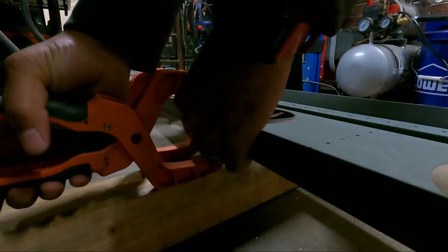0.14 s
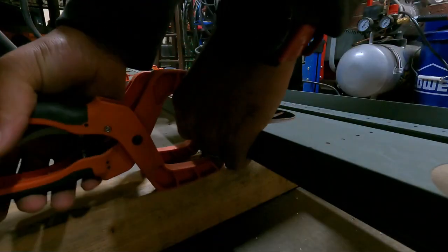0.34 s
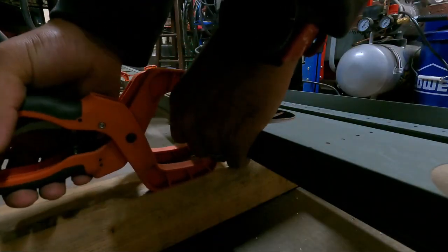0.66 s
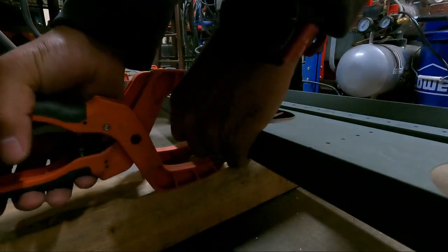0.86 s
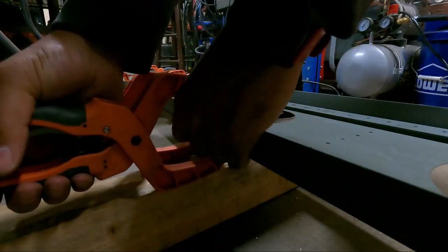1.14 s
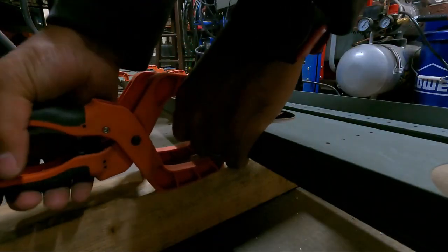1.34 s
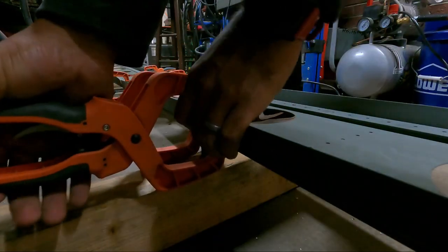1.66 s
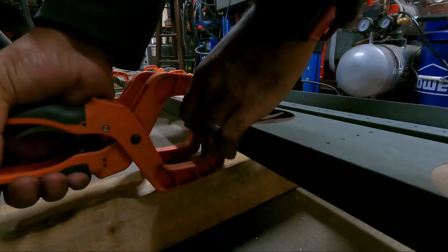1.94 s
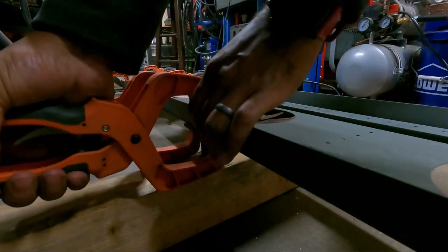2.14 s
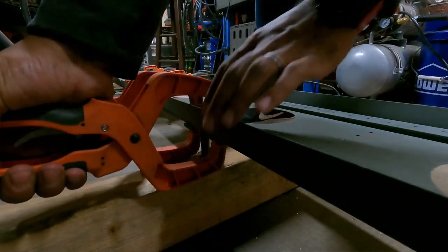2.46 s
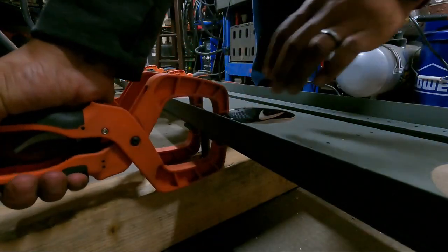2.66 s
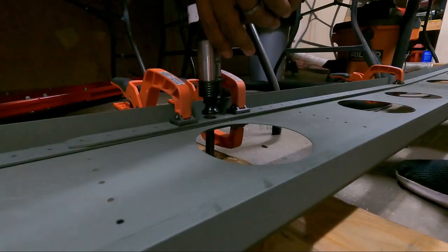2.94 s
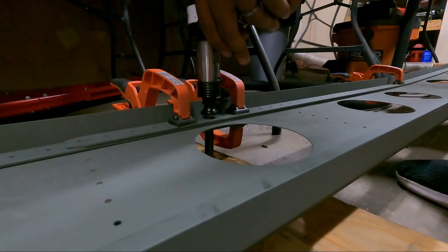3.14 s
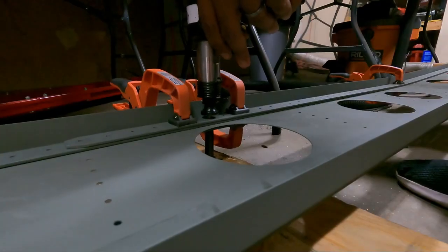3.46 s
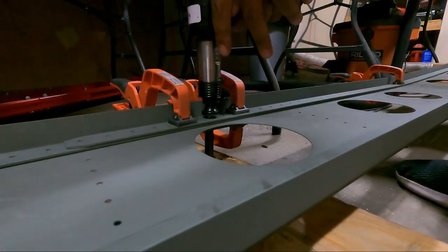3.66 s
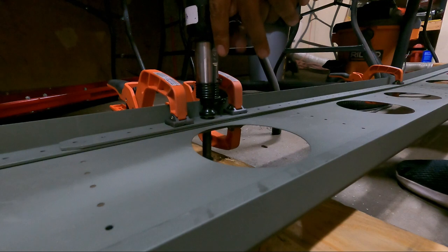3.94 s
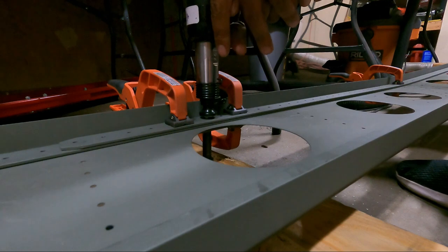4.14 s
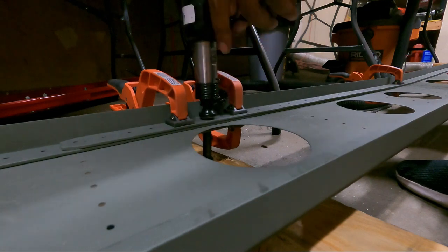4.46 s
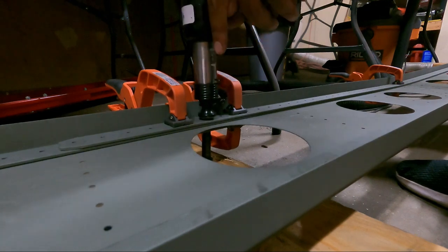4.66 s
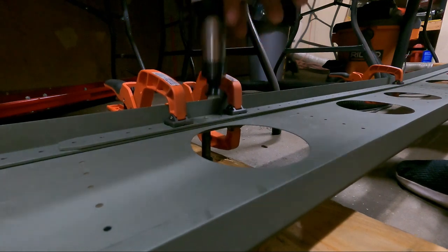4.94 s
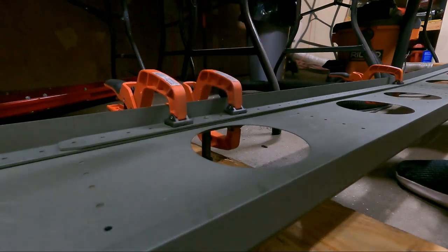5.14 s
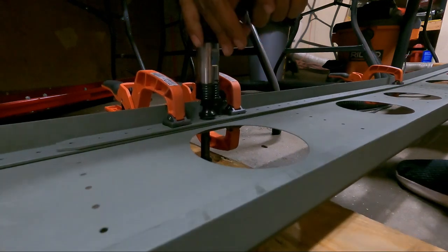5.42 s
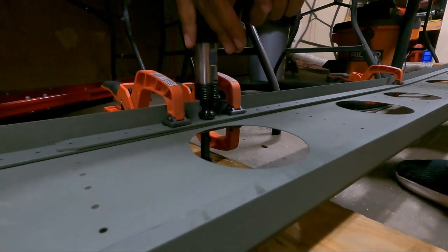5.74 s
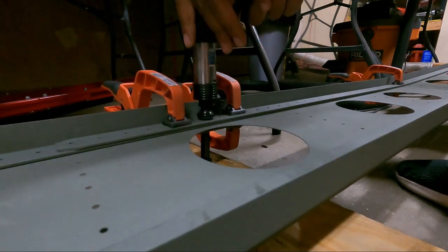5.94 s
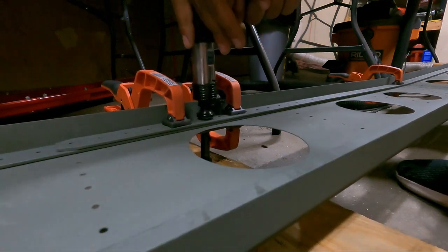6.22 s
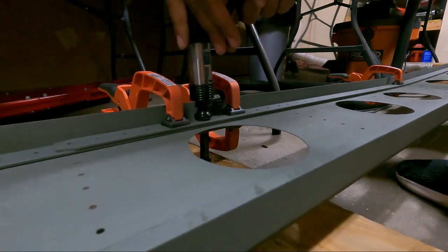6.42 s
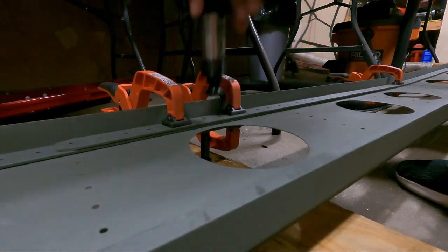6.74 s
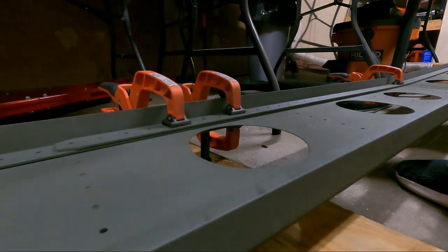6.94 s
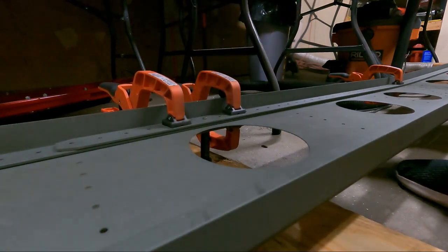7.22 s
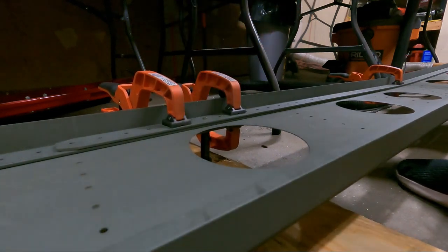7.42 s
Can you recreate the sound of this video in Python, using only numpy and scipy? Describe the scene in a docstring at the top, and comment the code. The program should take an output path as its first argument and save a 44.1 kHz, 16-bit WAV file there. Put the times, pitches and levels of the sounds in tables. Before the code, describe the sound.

In a garage workshop, a motor hums low while a hand clamp is squeezed close by, giving a quick run of sharp ratchet clicks and then a few separate ones. The hum drops away and an air rivet gun fires five short bursts into an aluminium panel, each a pop and hiss with rapid metallic hammering and thuds through a wooden bench. A faint hose whistle and a brief room echo trail each burst.

```python
"""A motor hums in a garage while hands squeeze a ratchet clamp onto an aluminium panel, click by click.
Then an air-powered rivet gun fires five short bursts: its valve pops, air hisses, and its piston hammers
about 36 times a second, slowing as the trigger is let go. Panel, bench and room ring, the air hose
whistles on briefly, and a limiter turns the loudest moments down."""
import sys
import numpy as np
from scipy import signal
from scipy.fft import rfft, irfft
from scipy.io import wavfile
from scipy.ndimage import uniform_filter1d

SR = 44100
rng = np.random.default_rng(int(sys.argv[2]) if len(sys.argv) > 2 else 0)


def pcm_store(signal):
    """Save signal as 16-bit PCM."""
    levels = np.round(np.clip(np.atleast_2d(signal), -1, 1) * 32767)
    wavfile.write(sys.argv[1], SR, levels.astype(np.int16).T)


N = 334278
TIME = np.arange(N) / SR
HIT_TIME = TIME[:SR // 4]  # the clock for one short sound
# time between hammer blows, and from the valve's pop to the first blow
BLOW_GAP_S, POP_TO_BLOW_S = .02785, .0288

# stretches of workshop rumble, each entering abruptly: start_s, level_db
RUMBLE_STRETCHES = [(0, -44.5), (.25, -41.5), (3.68, -41.5), (4.56, -45), (5.325, -40)]
# how loud the motor hums: time_s, level_db
HUM_LEVELS = [(0, -50), (.45, -39), (1, -35.5), (2, -37), (2.85, -41.5), (3, -82)]
# hands sliding on clamp and gun: middle_s, half_length_s, level_db
HAND_RUBS = [(0.045, 0.23, -71), (0.746, 0.056, -65.5), (0.914, 0.022, -66), (0.989, 0.027, -66.5),
             (1.7, 0.092, -58), (2.24, 0.065, -50.5), (2.7, .08, -55), (7.288, 0.11, -68)]
# faint touches of metal on metal: start_s, level_db, pitch_hz, ring_db
METAL_TOUCHES = [(.028, -57, 2400, 11.5), (.076, -55.5, 4100, 1), (4.362, -41.5, 3590, -4),
                 (6.24, -61.5, 3080, -11), (7.192, -57, 3330, -10), (7.266, -59, 5460, -12),
                 (7.333, -53, 5160, -9)]
# the ratchet's catch snapping over its teeth: start_s, level_db, knock_db, treble_db, pitch_hz
RATCHET_CLICKS = [(.218, -10.5, -4.5, 7, 1750), (0.2269, -3.5, -20.5, -1.5, 1750),
                  (0.2309, -11, -14, 2.5, 3500), (.239, -11, -23.5, 10, 3500), (0.2621, -6, -21, -1, 1750),
                  (.2707, -10, -12, 8.5, 3500), (.274, -3, -13.5, 3, 5800), (0.296, -12, -5, -0.5, 1750),
                  (1.2024, -4.5, -12.5, 0.5, 1720), (1.212, -6.5, -7, 3.5, 1720),
                  (1.3395, -3, -16, 0, 4150), (2.232, -7.5, -4.5, 1.5, 3400), (2.413, -4, -15.5, 3, 5100),
                  (2.6454, -10, -5, 2, 2900)]
# trigger pulls: start_s, stop_s, blow_db, sag_db_per_s, pop_db, hiss_db, push_db, treble_db
TRIGGER_PULLS = [(3.018, 3.156, -3.5, 24.5, 6.5, 1.5, 5, -3.5),
                 (3.853, 4.054, -2, 26.5, 1.5, 2.5, 5.5, 1.5), (4.7077, 4.848, -4.5, 22, 4, 5, 3.5, 0),
                 (5.439, 5.579, -4.5, 51, 1.5, -1, 4, 3), (6.373, 6.514, -6, -4, -11.5, 3, -1.5, -10)]

# the notes a struck thing rings with: pitch_hz, level_db, fade_s (time to fall by 60 dB)
CLAMP_NOTES = [(1700, 2, 0.023), (1940, -16.5, .04), (2550, -7, 0.13), (3152, 9.5, 0.021),
               (4280, -16, 0.023)]
METAL_NOTES = [(517, -19, 0.15), (859, -20.5, 0.13), (1074, -2, 0.064), (1162, 0.5, .059),
               (1580, -7.5, 0.057), (1927, -7.5, 0.04), (2550, 1.5, 0.047), (3030, -2.5, 0.03),
               (3215, -5.5, 0.034), (3485, -4.5, 0.078), (3550, -12, 0.057), (4980, -9.5, 0.04),
               (5950, -16, 0.027)]  # the gun's tip and the panel
BENCH_NOTES = [(35, -2, .15), (63.3, -2, 0.029), (110, 11, .061), (149.1, -2.5, 0.1), (202, -1.5, 0.076),
               (278.5, -7.5, 0.13), (315.7, -6, 0.053)]  # the wooden bench

# tone colours, or how strong a sound is from low to high: pitch_hz, level_db
RUMBLE_TONE = [(20, -4), (65, -5), (120, 3.5), (220, -1), (300, -13.5), (480, -18), (850, -14), (1300, -18),
               (2000, -28.5), (3200, -43.5), (6000, -52), (10000, -59), (16000, -75.5)]
SNAP_TONE = [(100, -15), (450, -17), (1000, -3.5), (1700, 10), (3000, 5), (5200, 2), (7300, -3),
             (10500, -14.5), (13000, -16.5), (16000, -24)]
CRACK_TONE = [(100, 4), (400, -4.5), (850, 1), (1150, 8), (1400, 2), (2100, -4.5), (2500, 4.5), (3450, 1),
              (3800, -3.5), (5500, -5), (7500, -8), (10000, -22), (13000, -26), (16000, -50.5)]
HISS_TONE = [(100, 7), (500, -5), (1200, 5), (2100, -2.5), (3400, 1), (4200, -3.5), (5600, -2.5),
             (7500, -9), (10000, -17.5), (13000, -36.5), (16000, -26.5)]
THUD_TONE = [(15, -11.5), (35, 4.5), (70, 7), (180, 2.5), (320, -6.5), (470, -28), (900, -32.5),
             (3000, -77.5)]
GARAGE_ECHO_TONE = [(30, -28), (80, -20), (160, -9), (450, 11), (1000, 0.5), (3000, 0), (6000, 4.5),
                    (10000, 4), (15000, -8)]
BENCH_ECHO_TONE = [(60, -14), (300, -1.5), (3000, -4.5), (8000, 1), (15000, -11.5)]
SKIN_TONE = [(500, -10.5), (1800, 3.5), (3500, 11), (6000, 6), (8500, -6), (11000, -14), (16000, -31)]
WOOD_TONE = [(40, -9.5), (120, -5.5), (220, -7.5), (450, -14), (800, -12), (1300, -17), (5000, -49)]
STEREO_TONE = [(30, -15), (80, -23.5), (250, -16.5), (3000, -12), (6000, -6.5), (9000, -4.5), (13000, -1)]

# how long the echoes last: pitch_hz, fade_s
GARAGE_ECHO_FADES = [(100, 0.74), (400, 0.51), (1200, 0.644), (3000, 0.51), (6000, 0.4734), (10000, 0.32),
                     (15000, 0.3)]
BENCH_ECHO_FADES = [(200, .11), (1500, .26), (6000, .15), (14000, .1)]
# moments when the sound spreads to left and right: start_s, starts_closing_s, level_db
WIDE_MOMENTS = [(0, .3, -15.5), (2.884, 3.25, 0), (3.682, 4.05, -4), (5.317, 5.62, 2)]


def amp(db):
    """Turns decibels into a number to multiply by."""
    return 10 ** (np.asarray(db) / 20)


def evened(x):
    """Scales a signal to an average power of 1."""
    return x / np.sqrt(np.mean(x ** 2) + 1e-20)


def look_up(table, hz):
    """Reads between a table's rows along a musical (logarithmic) pitch scale."""
    pitches, values = np.transpose(table)
    return np.interp(np.log(hz + 1), np.log(pitches + 1), values)


def add(mix, start_s, sound):
    """Mixes a sound in at the given time."""
    part = mix[max(round(start_s * SR), 0):][:len(sound)]
    part += sound[:len(part)]


def fade(t, fade_s):
    """Stays at 1 until t is zero, then falls by 60 dB every fade_s."""
    return np.exp(-np.log(1000) * np.maximum(t, 0) / fade_s)


def noise(tone, size=N):
    """Steady noise with the given tone colour."""
    gains = amp(look_up(tone, np.fft.rfftfreq(size, 1 / SR)))
    return evened(irfft(rfft(rng.standard_normal(size)) * gains, size))


def drift(rate_hz):
    """A smooth random wander."""
    gains = np.exp(-(np.fft.rfftfreq(N, 1 / SR) / rate_hz) ** 2)
    return evened(irfft(rfft(rng.standard_normal(N)) * gains, N))


def burst(tone, fade_s, hold_s=0, rise_s=.0005):
    """A puff of noise that swells quickly, holds, and dies away."""
    shape = (1 - np.exp(-(HIT_TIME / rise_s) ** 2)) * fade(HIT_TIME - hold_s, fade_s)
    return evened(noise(tone, len(HIT_TIME)) * shape) * np.sqrt(np.mean(shape ** 2))


def note(hz, db, fade_s):
    """One pure note dying away."""
    return amp(db) * fade(HIT_TIME, fade_s) * np.sin(2 * np.pi * hz * HIT_TIME)


def ring(notes, spread_db, detune=.016):
    """Struck metal: each strike shares out its force and shifts the notes a little differently."""
    out = 0
    for k, (hz, db, fade_s) in enumerate(notes):
        db += spread_db * rng.standard_normal()
        hz *= 1 + detune * rng.standard_normal()
        out += (-1) ** k * note(hz, db, fade_s)
    return out * (1 - np.exp(-HIT_TIME / .00017))


def brighten(x, db, corner_hz=5500):
    """Turns the treble up or down."""
    treble = x - signal.lfilter(*signal.butter(1, corner_hz, fs=SR), x)
    return x + (amp(db) - 1) * treble


def workshop_rumble(sink_db_per_s=34, sunk_db=-53, creep_db_per_s=2.5):
    """A dull rumble: each stretch is steady until the gun next stops, then sinks and creeps back."""
    db = np.zeros(N)
    for start, steady_db in RUMBLE_STRETCHES:
        gun_stops = min(stop for _, stop, *_ in TRIGGER_PULLS if stop > start)
        since = np.maximum(TIME - gun_stops, 0)
        stretch_db = np.maximum(steady_db - sink_db_per_s * since, sunk_db + creep_db_per_s * since)
        db = np.where(TIME >= start, stretch_db, db)
    ceiling_db = max(steady_db for _, steady_db in RUMBLE_STRETCHES)
    return amp(np.minimum(db, ceiling_db)) * noise(RUMBLE_TONE)


def motor_hum(pitch_hz=89.3, octave_db=-9, waver_hz=6.4):
    """A motor hums a low note and its octave, wavering in pitch and loudness."""
    phase = 2 * np.pi * np.cumsum(pitch_hz * (1 + .015 * drift(waver_hz))) / SR
    hum = np.sin(phase) + amp(octave_db) * np.sin(2 * phase)
    db = np.interp(TIME, *np.transpose(HUM_LEVELS))
    return amp(db + 2 * drift(waver_hz)) * hum


def handling():
    """Skin rubs on plastic and steel; now and then metal touches metal."""
    sliding = sum(amp(db) * np.exp(-((TIME - s) / half_s) ** 2) for s, half_s, db in HAND_RUBS)
    out = sliding * noise(SKIN_TONE) * amp(2 * drift(rate_hz=60))
    for start, db, hz, ring_db in METAL_TOUCHES:
        tap = burst(SKIN_TONE, fade_s=.049, rise_s=.00066)
        add(out, start, amp(db) * (tap + note(hz, ring_db, fade_s=.088)))
    return out


def ratchet(snap_db=-3, catch_db=-6, body_db=-24):
    """The catch snaps over a tooth and rings briefly, shakes the clamp and knocks the bench under it."""
    out = np.zeros(N)
    for start, db, knock_db, treble_db, hz in RATCHET_CLICKS:
        snap = brighten(amp(snap_db) * burst(SNAP_TONE, fade_s=.015, rise_s=.00032), treble_db)
        knock = amp(knock_db - 9) * burst(WOOD_TONE, fade_s=.13, rise_s=.0023)
        catch = ring([(hz, catch_db, .008)], spread_db=1)
        body = amp(body_db) * ring(CLAMP_NOTES, spread_db=3.5)
        add(out, start, amp(db) * (snap + knock + catch + body))
    return out


def valve(pop_s=.00023, thump_db=8, thump_hz=190, thump_s=.0012, lag_s=.0017, rattle_db=-5):
    """The valve pops open; the gun lurches and its tip rattles on the rivet before the first blow."""
    out = np.zeros(N)
    pop_age, thump_age = HIT_TIME / pop_s, HIT_TIME / thump_s
    pop = pop_age * (2 - pop_age) * np.exp(1 - pop_age)
    thump = thump_age * np.exp(1 - thump_age) * np.sin(2 * np.pi * thump_hz * HIT_TIME)
    for start, *_, pop_db, _, _, treble_db in TRIGGER_PULLS:
        tick = amp(-9) * burst(CRACK_TONE, fade_s=.034, rise_s=.0021)
        add(out, start, amp(pop_db) * brighten(amp(2) * pop + tick, treble_db))
        add(out, start + lag_s, amp(pop_db + thump_db) * thump)
        for delay in rng.uniform(.014, .027, size=3):
            rattle = pop + .5 * burst(CRACK_TONE, fade_s=.022)
            add(out, start + delay, amp(pop_db + rattle_db) * rattle)
    return out


def air_hiss(level_db=-16, surge_db=7, surge_s=.022, surge_width_s=.026, open_s=.014):
    """Air surges out as the piston first draws back, hisses on, and dies when the valve shuts."""
    out = np.zeros(N)
    air = noise(HISS_TONE) + amp(3) * noise(THUD_TONE)
    for start, stop, *_, hiss_db, _, treble_db in TRIGGER_PULLS:
        surge = surge_db * np.exp(-((TIME - start - surge_s) / surge_width_s) ** 2)
        flow = np.clip((TIME - start) / open_s, 0, 1) * fade(TIME - stop, fade_s=.32)
        out += amp(hiss_db + surge) * flow * brighten(air, treble_db)
    return amp(level_db + 2 * drift(rate_hz=100)) * out


def hose_whistle(pitch_hz=1225, width_hz=60, fuzz_hz=190, level_db=-28, sag_db_per_s=42, refill_s=.22):
    """The air hose whistles, fuzzily, until it has refilled after each burst."""
    off_hz = np.fft.rfftfreq(N, 1 / SR) - pitch_hz
    band = np.exp(-.5 * (off_hz / width_hz) ** 2) + amp(-12) * np.exp(-.5 * (off_hz / fuzz_hz) ** 2)
    flow = np.zeros(N)
    for start, stop, *_ in TRIGGER_PULLS:
        swell = np.clip((TIME - start) / (stop - start), 0, 1)
        since = np.maximum(TIME - stop, 0)
        flow += swell * amp(-sag_db_per_s * since) * fade(since - refill_s, fade_s=.4)
    whistle = evened(irfft(rfft(rng.standard_normal(N)) * band, N))
    return amp(level_db) * flow * whistle


def piston_strokes(start, stop, coast_s=.068, lag_s=.032):
    """The piston beats evenly, then slows on the last of its air. Rows: time_s, air_spent (0 to 1)."""
    beats = np.arange(start + POP_TO_BLOW_S, stop + coast_s, BLOW_GAP_S)
    spent = np.maximum(beats - stop, 0) / coast_s
    return np.transpose([beats + lag_s * spent ** 3, spent])


def hammer_blows(first_db=5, coasting_db=-11, rebound_s=.0022, rebound_db=-7):
    """Blows on one spot crack alike and ring tip and panel; the bar held behind the rivet bounces."""
    out = np.zeros(N)
    for start, stop, blow_db, sag_db_per_s, *_, treble_db in TRIGGER_PULLS:
        crack = amp(2.5) * burst(CRACK_TONE, fade_s=.011, hold_s=.003)
        for k, (hit_s, spent) in enumerate(piston_strokes(start, stop)):
            # the first blow gets the full air pressure; coasting blows are weak; all vary a little
            db = blow_db + first_db * (k == 0) - sag_db_per_s * k * BLOW_GAP_S
            db += coasting_db * spent ** 2 + rng.standard_normal()
            panel = amp(-15) * burst(CRACK_TONE, fade_s=.27)
            metal = amp(-1) * ring(METAL_NOTES, spread_db=.5, detune=.0065)
            add(out, hit_s, amp(db) * brighten(crack + panel + metal, treble_db))
            bounce_s = hit_s + rebound_s * rng.uniform(1, 1.3)
            add(out, bounce_s, amp(db + rebound_db) * burst(CRACK_TONE, fade_s=.011))
    return out


def bench_recoil(bench_db=-11, thud_db=-9, lag_s=.0028, return_s=.0172, return_db=-1, weaken_db=-6):
    """The piston shoves the bench going out and coming back; its last stroke has little air behind it."""
    out = np.zeros(N)
    shove = amp(bench_db) * (1 - np.exp(-HIT_TIME / .0007)) * sum(note(*row) for row in BENCH_NOTES)
    for start, stop, *_, push_db, _ in TRIGGER_PULLS:
        for hit_s, _ in piston_strokes(start, stop):
            progress = np.clip((hit_s - start) / (stop - start), 0, 2)
            force = amp(push_db + weaken_db * progress ** 2)
            thud = amp(thud_db) * burst(THUD_TONE, fade_s=.077)
            add(out, hit_s + lag_s, force * (shove + thud))
            if hit_s < stop:
                add(out, hit_s + return_s + .0007 * rng.standard_normal(), force * amp(return_db) * shove)
    return out


def echoes(x, fades, tone, delay_s):
    """Many reflections blur into a tail in which each pitch dies at its own speed."""
    hz, t, bands = signal.stft(rng.standard_normal(SR), SR, nperseg=256)
    fade_s = look_up(fades, hz)[:, None]
    same_energy = np.sqrt(2 * np.log(1000) / (fade_s * SR))  # for long and short tails alike
    bands = bands * fade(t, fade_s) * amp(look_up(tone, hz))[:, None] * same_energy
    tail = signal.istft(bands, SR, nperseg=256)[1]
    return signal.fftconvolve(x, np.pad(tail, (round(delay_s * SR), 0)))[:N]


def stereo_spread(x, narrow_db=-40, open_s=.02, close_db_per_s=63.5):
    """Left and right catch slightly different reflections; the width opens fast and closes slowly."""
    width = amp(narrow_db)
    for start, closes, db in WIDE_MOMENTS:
        opening = np.clip((TIME - start) / open_s, 0, 1)
        width = width + opening * amp(db - close_db_per_s * np.maximum(TIME - closes, 0))
    hz = np.fft.rfftfreq(1024, 1 / SR)
    lag = np.cumsum(rng.uniform(0, 1, len(hz)))  # the phase lag grows unevenly with pitch
    smear = irfft(amp(look_up(STEREO_TONE, hz)) * np.exp(-1j * lag))
    side = width * signal.fftconvolve(x, smear)[:N]
    return np.array([x + side, x - side])


def scene():
    """Gun and clamp close by, with quick echoes off the bench and the long echo of the garage."""
    gun = hammer_blows() + bench_recoil() + valve() + air_hiss()
    clamp, hose = ratchet(), hose_whistle()
    near = echoes(amp(-8) * gun + amp(-3) * clamp, BENCH_ECHO_FADES, BENCH_ECHO_TONE, delay_s=.004)
    # the clamp sends a different mix of its notes towards the walls
    to_walls = amp(-16) * gun + amp(-17) * ratchet() + amp(-25) * hose
    far = echoes(to_walls, GARAGE_ECHO_FADES, GARAGE_ECHO_TONE, delay_s=.018)
    return stereo_spread(gun + clamp + hose + near + far + handling() + workshop_rumble() + motor_hum())


def record(dry, threshold_db=-22, share=.53, recovery_db_per_s=110, bottom_hz=10, top_hz=15600):
    """A limiter turns blows down and lets echoes swell back; peaks, deep bass and top treble are cut."""
    power = uniform_filter1d((dry ** 2).mean(0), size=260)
    power_db = 10 * np.log10(abs(power) + 1e-12)
    fall_db = TIME * recovery_db_per_s
    held_db = np.maximum.accumulate(power_db + fall_db) - fall_db  # jumps up, then sinks steadily
    over_db = np.maximum(held_db - threshold_db, 0)
    limited = dry * amp(-share * uniform_filter1d(over_db, size=130))
    rounded = limited / (1 + limited ** 6) ** (1 / 6)
    trimmed = signal.lfilter(*signal.butter(1, bottom_hz, "highpass", fs=SR), rounded)
    treble_cut = signal.firwin(511, top_hz, window=("kaiser", 9), fs=SR)
    return signal.oaconvolve(trimmed, treble_cut[None], "same")


dry = scene()
out = record(dry)
pcm_store(out)
```